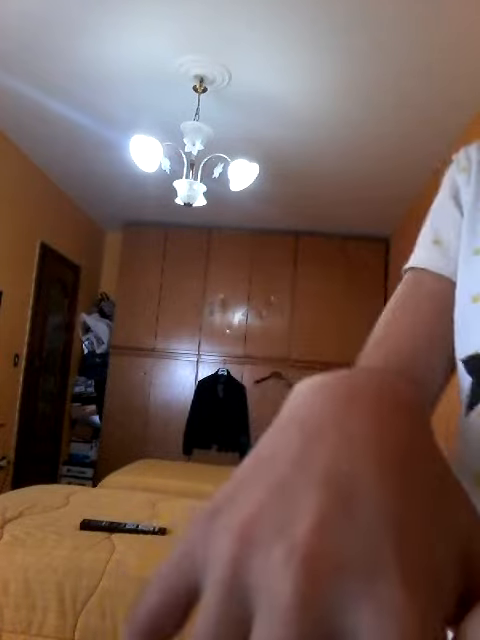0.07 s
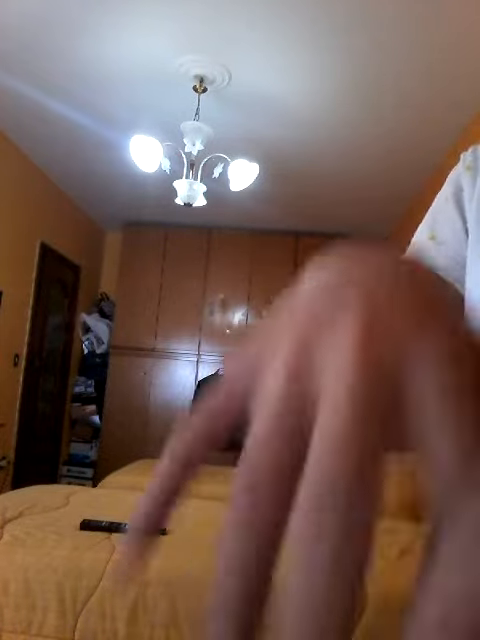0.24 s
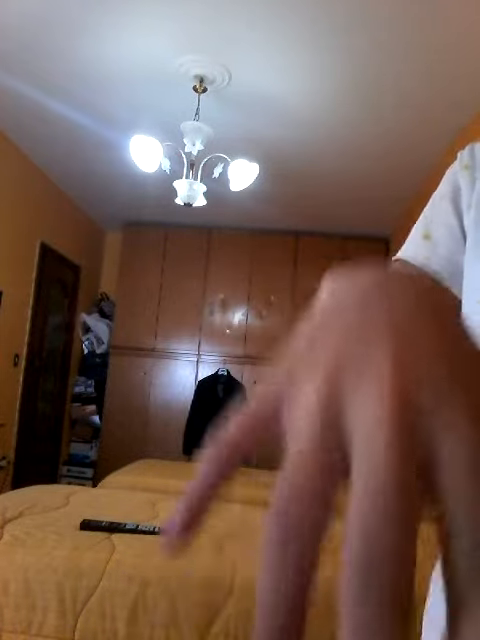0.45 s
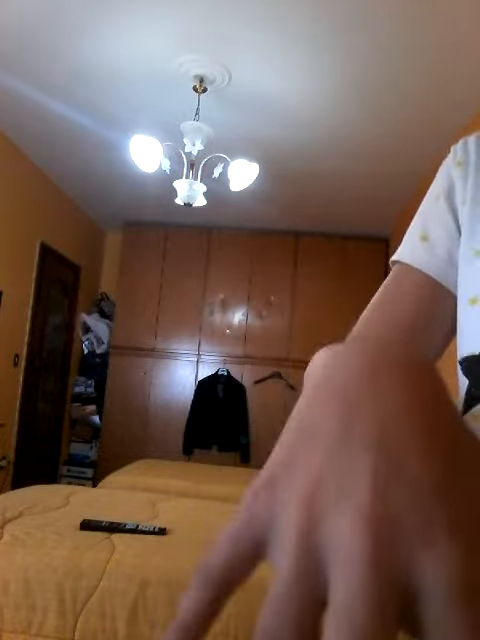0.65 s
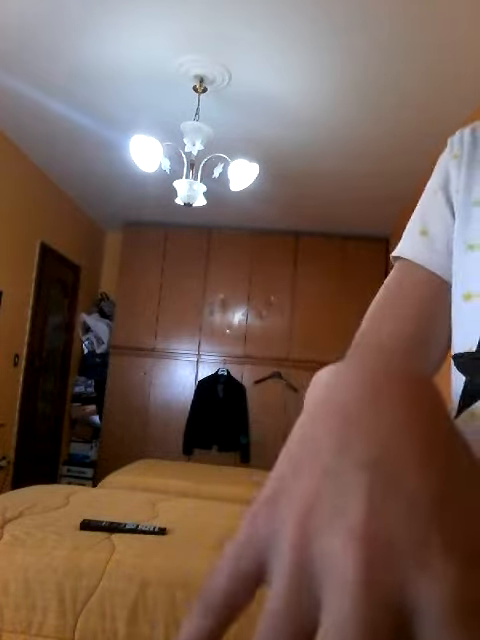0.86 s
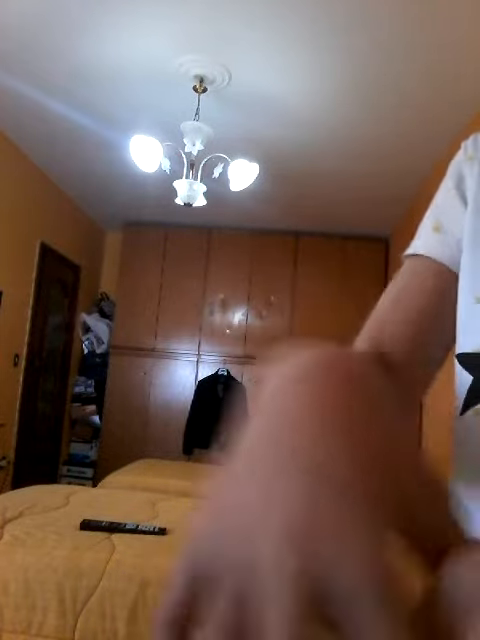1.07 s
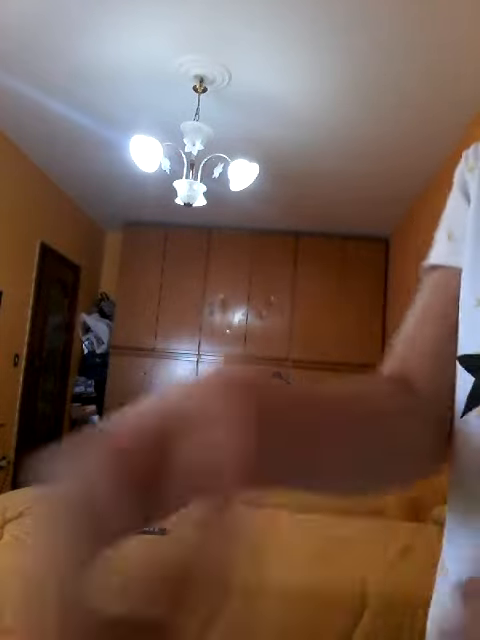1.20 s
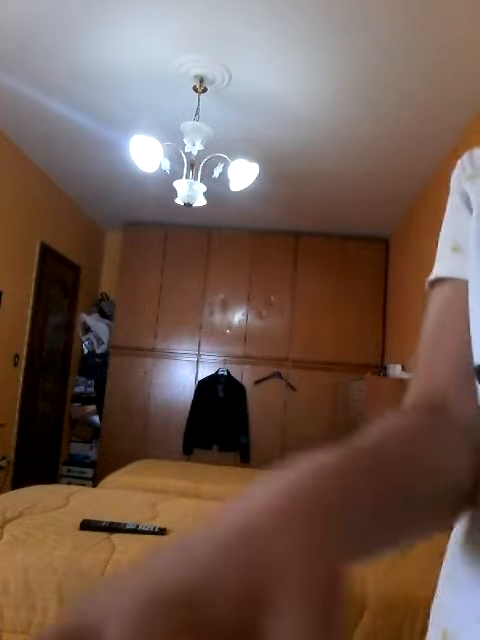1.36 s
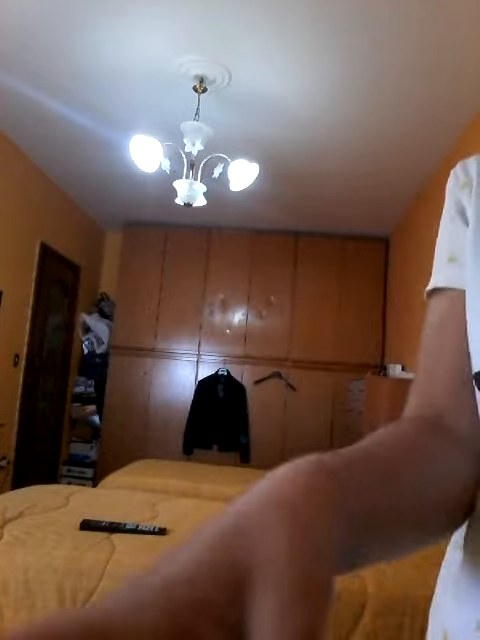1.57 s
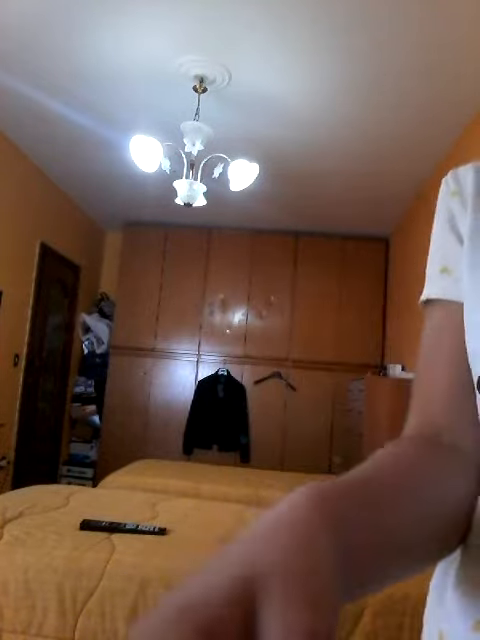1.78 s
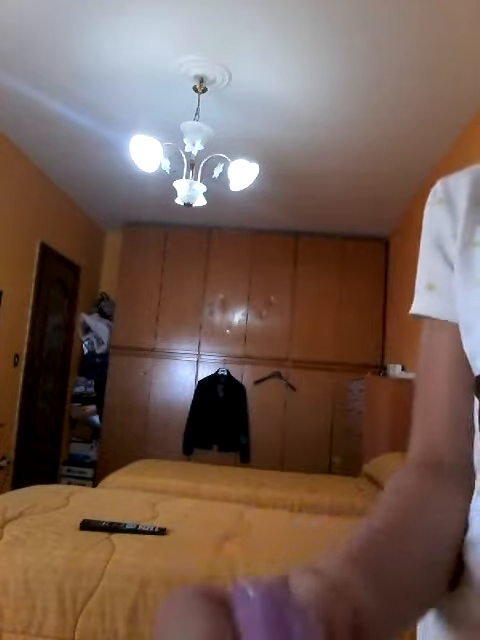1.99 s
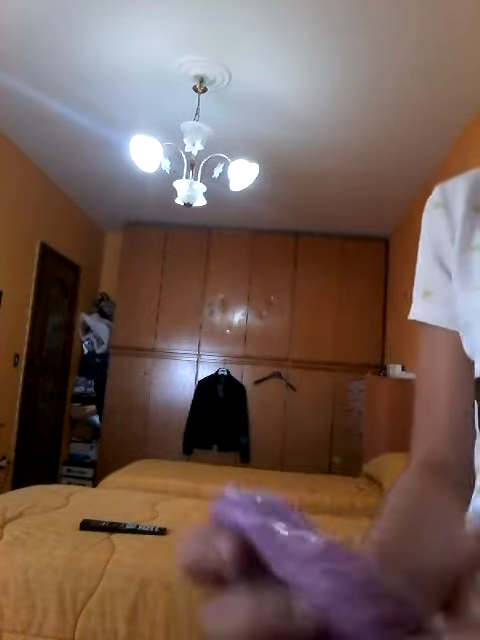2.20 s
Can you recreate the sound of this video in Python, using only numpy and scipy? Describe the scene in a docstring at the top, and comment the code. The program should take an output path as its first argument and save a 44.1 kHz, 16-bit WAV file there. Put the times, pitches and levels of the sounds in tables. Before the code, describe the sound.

Soft beaded slime pressed by hand, heard very close. A small pop at 0.1 s, then a loud, wet, hollow cluster of pops at 0.2-0.25 s with low thumps. Quiet room tone follows, with a faint breathy squeak near 1.03 s. A second squelch with sharp snaps comes at 1.13-1.23 s. From 1.45 to 2.25 s, kneading crackles densely with sticky clicks, little pops and dull table thuds; short room echoes.

```python
"""A hand works fluffy beaded slime on a table in a bedroom, heard from close by.
Two quick presses squelch and pop; then kneading bursts a dense run of small air pockets.
Air pockets ring for some cycles while their film tears with a tick of noise; small bubbles burst sharply.
Flurries of tiny bubbles make short spurts and one faint breathy squeak; low thumps sit under the first press.
The table booms as a set of tones, with short room echoes and a quiet background of filtered noise."""
import sys
import numpy as np
from scipy import signal
from scipy.fft import rfft, irfft, next_fast_len
from scipy.io import wavfile
from scipy.ndimage import uniform_filter1d

SR = 44100
rng = np.random.default_rng(int(sys.argv[2]) if len(sys.argv) > 2 else 0)


def master_out(mix):
    """Clip the mix to full scale and print it as 16-bit PCM to the path in sys.argv[1]."""
    frames = np.transpose(np.atleast_2d(mix))
    ceiling = np.clip(frames, -1, 1)
    pcm = np.round(ceiling * 32767).astype(np.int16)
    wavfile.write(sys.argv[1], SR, pcm)


N = 99225  # samples: 2.25 s


def amp(db):
    """Turn decibels into gain."""
    return 10 ** (np.asarray(db) / 20)


def unit(x):
    """Scale to an average (rms) level of 1."""
    return x / np.sqrt(np.mean(x ** 2) + 1e-20)


def along(points, hz):
    """Read a curve of (pitch_hz, value) points, joined up on a log pitch axis."""
    f, v = np.transpose(points)
    return np.interp(np.log(hz + 1), np.log(f + 1), v)


def coloured(x, points):
    """Filter with the gains of (pitch_hz, gain_db) points; the filter never answers before its input."""
    m = 2 * next_fast_len(N)
    gain = amp(along(points, np.fft.rfftfreq(m, 1 / SR)))
    # folding the cepstrum (spectrum of the log gain) forward in time makes the filter causal
    cepstrum = irfft(np.log(gain), m)
    cepstrum[1:m // 2] *= 2
    cepstrum[m // 2 + 1:] = 0
    return irfft(rfft(x, m) * np.exp(rfft(cepstrum)), m)[:N]


def fade(t, t60):
    """Die away exponentially, 60 dB down at t60 (in the same unit as t)."""
    return np.exp(-np.log(1000) * t / t60)


def add(out, start_s, sound):
    """Mix a sound in at its start time."""
    part = out[max(round(start_s * SR), 0):][:len(sound)]
    part += sound[:len(part)]


RISE_CYCLES = 0.26  # quick swell of sharp bursts, grains and spurt bubbles
GLIDE = 0.044  # share by which a pocket's pitch ends up higher as it empties
OVERTONE, OVERTONE_DB = 2.01, -18  # second mode of a pocket: pitch ratio, level


def pocket(t, hz, cycles, rise):
    """An opened air pocket swells and rings for some cycles, rising in pitch; its overtone dies sooner."""
    n = t * hz  # time counted in cycles
    phase = 2 * np.pi * n * (1 + GLIDE * np.tanh(n / cycles))
    decay = fade(n, cycles)
    main = np.sin(phase) * (1 - np.exp(-n / rise))
    audible = OVERTONE * hz < SR / 2
    overtone = amp(OVERTONE_DB) * decay * np.sin(OVERTONE * phase) * audible
    return (main + overtone) * decay


def grains(colour, per_s, hz, spread, cycles, scatter_db, even_s, size):
    """A stream of tiny pocket bursts of random pitch and strength, evened out to an rms level of 1."""
    draws = rng.random((int(per_s * N / SR), 4))
    when, where, luck, life = np.split(draws, 4, axis=1)
    pitch = np.clip(hz * np.exp(spread * np.log(where / (1 - where))), 150, 15000)
    strength = amp(scatter_db * np.minimum(-np.log(luck), np.pi))
    sample = np.arange(size)
    waves = strength * pocket(sample / SR, pitch, cycles * (.5 + life), RISE_CYCLES)
    at = (when * N).astype(int) + sample
    mix = np.bincount(at.ravel(), waves.ravel(), N)[:N]
    x = unit(coloured(mix, colour))
    # divide by the running level so that the stream stays steady
    power = np.abs(uniform_filter1d(x ** 2, max(int(even_s * SR), 2)))
    return unit(x / np.sqrt(power + .01))


def levels(gestures):
    """Gains of the low and the fine grains over time; silent outside the gestures."""
    t = np.arange(N) / SR
    low, fine = np.zeros(N), np.zeros(N)
    for gesture in gestures:
        time_s, low_db, fine_db = np.transpose(gesture)
        low += amp(np.interp(t, time_s, low_db, left=-np.inf, right=-np.inf))
        fine += amp(np.interp(t, time_s, fine_db, left=-np.inf, right=-np.inf))
    return low, fine


AIR_LEVEL_DB = -63.5
# Tone of the quiet room: pitch_hz, relative level_db (per Hz)
AIR_COLOUR = [(15, 6), (45, 7), (65, -6.5), (100, -7.5), (165, -10.5), (260, -8), (390, -6), (500, -5.5),
              (900, -5.5), (1700, -9), (4300, -24.5), (15500, -24)]


def background():
    """The quiet background of the room: steady noise, strongest in the bass."""
    return amp(AIR_LEVEL_DB) * unit(coloured(rng.standard_normal(N), AIR_COLOUR))


TICK_RISE_S = 0.00017


def noise_burst(t, t60_s):
    """A very short burst of noise, rising fast and dying away."""
    return fade(t, t60_s) * (1 - np.exp(-t / TICK_RISE_S)) * rng.standard_normal(len(t))


BURST_CYCLES = 5.04  # cycles to fall 60 dB
CRACK_T60_S, CRACK_DB = 0.0012, -9.5  # noise in a sharp burst; level relative to the burst
# Small bubbles bursting sharply, before the pocket colour: start_s, level_db, pitch_hz
SHARP_BURSTS = [(.012, -40, 2420), (1.134, -38, 3200), (1.1695, -21, 5330), (1.1698, -22.5, 2270),
                (1.1758, -26, 4800), (1.5051, -27, 2470), (1.6158, -25, 2620), (1.62, -31, 2500),
                (1.6272, -30, 2300), (1.633, -32, 4200), (1.6464, -34, 2850), (1.6582, -27, 2930),
                (1.711, -32.5, 4460), (1.747, -32, 4100), (1.7704, -31, 6900), (1.7711, -28, 3670),
                (1.79, -31, 4440), (1.8765, -36.5, 6500), (1.8928, -20, 2120), (1.9022, -27, 3000),
                (1.914, -21.5, 2900), (1.9238, -21, 2200), (1.9374, -22.5, 2600), (1.9437, -26, 2300),
                (1.945, -29, 6130), (1.9579, -25, 2540), (1.9901, -22.5, 2220), (2.0088, -32, 2320),
                (2.025, -37, 5000), (2.1133, -37, 2560), (2.1564, -27, 2850), (2.1619, -31, 3480)]


def sharp_bursts():
    """Small bubbles burst sharply: a short ring with a crack of noise."""
    out, t = np.zeros(N), np.arange(SR // 10) / SR
    for start_s, level_db, pitch_hz in SHARP_BURSTS:
        ring = pocket(t, pitch_hz, BURST_CYCLES, RISE_CYCLES)
        crack = amp(CRACK_DB) * noise_burst(t, CRACK_T60_S)
        add(out, start_s, amp(level_db) * (ring + crack))
    return coloured(out, POCKET_COLOUR)


POP_SWELL_CYCLES, TICK_T60_S = 0.46, 0.00071
POP_DB, TICK_DB = 0.9, 5  # added to every ring level and every tick level in POPS
# Small pockets give little bass: pitch_hz, gain_db
POCKET_COLOUR = [(40, -16), (150, -12), (350, -10.5), (480, 1), (1500, -0.5), (9000, 1), (15000, -11)]
# Air pockets bursting, and two low thumps (200-260 Hz) under the first press; before the gains and colour:
# start_s, ring level_db, pitch_hz, ring length in cycles (to fall 60 dB), tick level_db
POPS = [(0.108, -21.5, 1530, 6.9, -27), (0.1317, -37, 1420, 5, -51), (.2021, -24, 1300, 20, -58),
        (0.2103, -19, 1730, 14, -57), (0.2178, -17, 950, 14, -27.5), (0.2217, -7, 927, 16.6, -44),
        (.2238, -25.5, 253, 8.6, -60), (.2255, -8.5, 686, 9.5, -43), (0.2362, -17, 2000, 8, -45),
        (0.238, -25, 205, 14, -60), (.249, -22, 840, 15.4, -56), (1.1751, -17, 557, 15, -35),
        (1.1789, -19.5, 454, 18, -51), (1.418, -19, 1800, 1.97, -48), (1.4917, -29.5, 1570, 19, -47),
        (1.5097, -32, 1420, 35, -64), (1.5172, -32, 1350, 68, -54), (1.533, -25.5, 1517, 38, -32.5),
        (1.557, -28, 1294, 25, -45), (1.5924, -29.5, 2050, 6.5, -49), (1.6092, -30, 827, 21, -46),
        (1.6158, -30, 870, 38, -46), (1.6454, -26, 1530, 14.7, -50), (1.66, -31, 2550, 10, -44),
        (1.6766, -33, 1130, 9.1, -49), (1.7462, -26.5, 2190, 18.3, -64), (1.7687, -19, 1910, 13.4, -42),
        (1.7985, -31, 1440, 17, -59), (1.8119, -32, 1320, 17, -58), (1.815, -27.5, 1470, 12, -53),
        (1.8415, -27.5, 1490, 10, -50), (1.8555, -23.5, 940, 11.5, -41), (1.8892, -28.5, 1040, 22, -52),
        (1.9037, -14.5, 1290, 7.4, -29.5), (1.9358, -24, 2120, 9.5, -53), (1.988, -29, 1497, 32, -48),
        (2.0484, -33.5, 1400, 21, -45), (2.1584, -25, 990, 3.7, -49), (2.1847, -33, 2140, 17, -40),
        (2.1956, -35.5, 1380, 58, -40), (2.2216, -35.5, 1470, 28, -47), (2.2243, -36, 1340, 36, -60)]


def pops():
    """The film tears with a tick and the air pocket behind it rings; two low thumps are made the same way."""
    out, t = np.zeros(N), np.arange(SR // 10) / SR
    for start_s, ring_db, pitch_hz, cycles, tick_db in POPS:
        ring = pocket(t, pitch_hz, cycles, POP_SWELL_CYCLES)
        tick = noise_burst(t, TICK_T60_S)
        tick /= np.linalg.norm(tick)
        add(out, start_s, amp(ring_db + POP_DB) * ring + amp(tick_db + TICK_DB) * tick)
    return coloured(out, POCKET_COLOUR)


SPURT_PER_S, SPURT_SPREAD, SPURT_CYCLES = 3000, 0.33, 8.6  # bubbles a second, pitch spread, ring cycles
# Spurts of tiny bubbles; at 1.031 s a faint breathy squeak: start_s, length_s, level_db, pitch_hz
SPURTS = [(0.1105, .02, -55, 1280), (0.2332, .007, -34.5, 3600), (0.238, 0.011, -45, 4000),
          (1.031, .07, -69.5, 1660), (1.163, .012, -41.5, 1450), (1.182, 0.017, -47.5, 2880)]


def spurts():
    """Each row is a crowd of short rings of like pitch: a spurt of tiny bubbles, or one faint breathy squeak."""
    out, t = np.zeros(N), np.arange(SR // 50) / SR
    for start_s, length_s, level_db, pitch_hz in SPURTS:
        flurry = np.zeros(SR // 10)
        count = max(int(length_s * SPURT_PER_S), 1)
        for k, (late, size) in enumerate(rng.random((count, 2))):
            bubble_hz = pitch_hz * np.exp(SPURT_SPREAD * np.pi * (size - .5))
            bubble = pocket(t, bubble_hz, SPURT_CYCLES, RISE_CYCLES)
            add(flurry, length_s * (k + late) / count, bubble)
        flurry *= np.sqrt(length_s * SR) / np.linalg.norm(flurry)  # rms 1 over its length
        add(out, start_s, amp(level_db) * flurry)
    return out


# Two wet presses, each a list of points: time_s, squelch level_db, fizz level_db
PRESSES = [
    [(.183, -57, -90), (.199, -57, -64), (.204, -36, -48), (.213, -39.5, -49.5), (.222, -27.5, -40),
     (.231, -34.5, -57), (.236, -28.5, -66), (.247, -30, -53), (.256, -56, -66), (.3, -52.5, -63),
     (.32, -77, -85)],
    [(1.118, -67, -63), (1.128, -36.5, -58.5), (1.16, -39, -55), (1.17, -32.5, -55), (1.186, -32, -52.5),
     (1.214, -46, -56), (1.232, -73, -70)],
]
# Tone of the squelch: pitch_hz, relative gain_db
SQUELCH_COLOUR = [(60, -24), (150, -24.5), (230, 1.5), (370, -11.5), (500, -4), (700, -0.5), (1100, -5.5),
                  (2000, -1.5), (3200, -3.5), (5000, -15), (15000, -11)]
# Tone of the fizz, used again in the kneading: pitch_hz, relative gain_db
FIZZ_COLOUR = [(300, -24), (2000, 7), (3500, 2), (5500, -3), (8500, 3.5), (10500, -4), (15500, -2)]


def presses():
    """Large wet pockets squelch under the palm while the foam fizzes with finer grains."""
    low, fine = levels(PRESSES)
    squelch = grains(SQUELCH_COLOUR, per_s=1500, hz=1000, spread=0.391, cycles=5.7,
                     scatter_db=4.5, even_s=0.0077, size=600)
    fizz = grains(FIZZ_COLOUR, per_s=4000, hz=5050, spread=0.25, cycles=1.3,
                  scatter_db=1.5, even_s=0.021, size=120)
    return low * squelch + fine * fizz


TABLE_RISE_CYCLES = 0.95
# Tones the table rings at: pitch_hz, level_db, t60_s (for a free table)
TABLE_MODES = [(94.5, -17, 0.16), (239.6, 3.5, 0.13), (468.4, 1.5, 0.13), (590, -9, 0.072),
               (720.7, 2.5, 0.12), (930, 9, 0.13)]


def table_ring(corner_hz, free):
    """A soft contact wakes mainly the table's low tones; a share of free below 1 shortens the ring."""
    t = np.arange(SR // 2) / SR
    ring = np.zeros(len(t))
    for hz, level_db, t60_s in TABLE_MODES:
        softness = np.hypot(1, (hz / corner_hz) ** np.pi)
        rise = 1 - np.exp(-t * hz / TABLE_RISE_CYCLES)
        ring += amp(level_db) / softness * np.sin(2 * np.pi * hz * t) * fade(t, t60_s * free) * rise
    return ring


KNEAD_FROM_S, PRESSED_DECAY = 1.3, 0.66  # from here the kneading hand leaves this share of ring time
RUB_DB, RUB_HZ = -52, 500
RUB_DECAY = 0.28  # share of ring time left under the sticking slime
# The hand pushing down on the table: start_s, level_db, hardness as a low-pass corner_hz
PUSHES = [(0.2236, -31, 1200), (1.128, -60, 700), (1.1764, -32.5, 640), (1.383, -52, 310),
          (1.469, -37, 120), (1.504, -37.5, 300), (1.55, -37.5, 306), (1.603, -38.5, 297),
          (1.737, -24.5, 197)]


def table(slime):
    """Each push rings the table, and the crackling slime keeps it faintly stirred."""
    out = amp(RUB_DB) * signal.fftconvolve(slime, table_ring(RUB_HZ, RUB_DECAY))[:N]
    for start_s, level_db, corner_hz in PUSHES:
        free = PRESSED_DECAY if start_s > KNEAD_FROM_S else 1
        add(out, start_s, amp(level_db) * table_ring(corner_hz, free))
    return out


FIZZ_DB, STICKY_DB = -2, -2.5  # added to the fine level of the strokes
# Kneading strokes, each a list of points: time_s, crackle level_db, fine level_db (before the two above)
STROKES = [
    [(1.44, -60, -80), (1.478, -54, -61.5), (1.51, -41.5, -55.5), (1.536, -41.5, -50),
     (1.548, -40.5, -54.5), (1.56, -54, -59), (1.574, -67, -68)],
    [(1.58, -56, -74), (1.604, -41.5, -52.5), (1.618, -43, -51), (1.63, -48.5, -60), (1.646, -44.5, -56.5),
     (1.68, -50.5, -61.5), (1.686, -58.5, -63), (1.735, -55.5, -61)],
    [(1.745, -40, -56.5), (1.785, -55.5, -69), (1.81, -48.5, -62), (1.885, -46.5, -59.5),
     (1.91, -43, -53.5), (1.94, -44, -53), (1.972, -47.5, -54.5), (1.988, -51.5, -54.5), (2.028, -49, -63),
     (2.04, -62, -65)],
    [(2.043, -72, -62), (2.049, -41.5, -61), (2.066, -57.5, -66), (2.098, -51, -58), (2.12, -44.5, -57.5),
     (2.148, -51.5, -59.5), (2.16, -42.5, -53), (2.176, -48, -57.5), (2.197, -49.5, -53),
     (2.21, -59, -62.5), (2.226, -47.5, -58.5), (2.25, -59, -66)],
]
# Tone of the crackle: pitch_hz, relative gain_db
CRACKLE_COLOUR = [(60, -12.5), (150, -14.5), (240, -2), (370, -7), (520, 4), (700, -3.5), (1400, 0.5),
                  (1900, -2.5), (2800, 1), (5000, -16), (15000, -19)]
# Tone of the tiny clicks of sticky film: pitch_hz, relative gain_db
STICKY_COLOUR = [(200, -6), (900, -4.5), (3000, -0.5), (5200, -8.5), (8000, 1.5), (15000, -10)]


def kneading():
    """Small pockets burst by the hundred as fingers fold the slime; sticky film clicks off the skin."""
    low, fine = levels(STROKES)
    crackle = grains(CRACKLE_COLOUR, per_s=1000, hz=1573, spread=0.308, cycles=6.06,
                     scatter_db=2.0, even_s=0.014, size=500)
    fizz = grains(FIZZ_COLOUR, per_s=3000, hz=6400, spread=0.38, cycles=2.2,
                  scatter_db=1.5, even_s=0.02, size=120)
    clicks = grains(STICKY_COLOUR, per_s=300, hz=3550, spread=0.28, cycles=2.6,
                    scatter_db=2, even_s=0.033, size=150)
    return low * crackle + fine * (amp(FIZZ_DB) * fizz + amp(STICKY_DB) * clicks)


NEAR_DB, NEAR_T60_S, TAIL_DB = -12.5, 0.026, -19.5  # levels before the echo colour
# How long the room's tail lasts: pitch_hz, t60_s
ROOM_DECAY = [(100, 0.25), (900, 0.19), (3000, 0.11), (10000, 0.038)]


def room(x):
    """Quick reflections from nearby surfaces, with the short tail of a furnished room."""
    hz, t, z = signal.stft(rng.standard_normal(SR // 2), SR, nperseg=256)
    tail = signal.istft(z * fade(t, along(ROOM_DECAY, hz)[:, None]), SR, nperseg=256)[1]
    near = rng.standard_normal(len(tail)) * fade(np.arange(len(tail)) / SR, NEAR_T60_S)
    answer = amp(TAIL_DB) * tail / np.linalg.norm(tail) + amp(NEAR_DB) * near / np.linalg.norm(near)
    delayed = np.pad(answer, (SR // 500, 0))  # echoes start 2 ms late
    wet = signal.fftconvolve(x, delayed)[:N]
    return coloured(wet, [(200, -7), (1500, 1.0), (4000, -4), (12000, -1.0)])  # pitch_hz, gain_db


def scene():
    """Slime and table in the room, over its quiet background."""
    crackle = kneading()
    dry = sharp_bursts() + pops() + spurts() + presses() + table(crackle) + crackle
    return (dry + room(dry) + background())[None]


TOP_HZ = 15830
# Tone of the microphone: pitch_hz, gain_db
MIC_COLOUR = [(15, -7), (45, -30), (60, -16.5), (88, -1.5), (160, -8.5), (220, -3), (15000, 0)]


def record(dry):
    """The microphone thins the deep bass and keeps nothing above its band limit."""
    m = 2 * next_fast_len(N)
    spectrum = rfft(coloured(dry[0], MIC_COLOUR), m)
    kept = np.fft.rfftfreq(m, 1 / SR) < TOP_HZ
    return irfft(spectrum * kept, m)[None, :N]


dry = scene()
out = record(dry)
master_out(out)
```